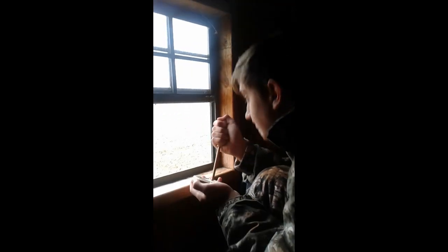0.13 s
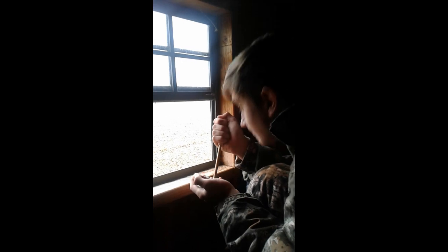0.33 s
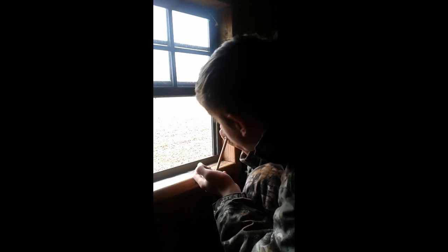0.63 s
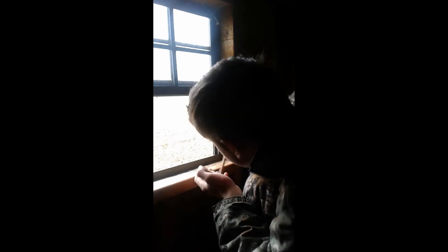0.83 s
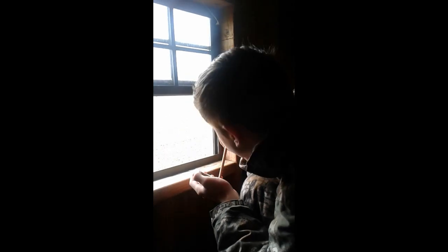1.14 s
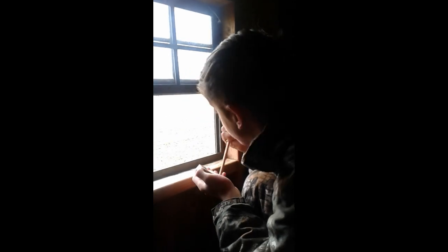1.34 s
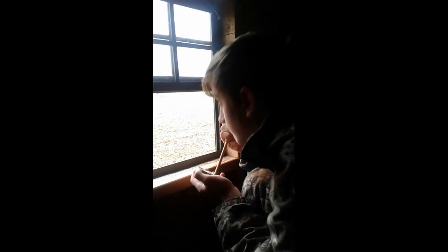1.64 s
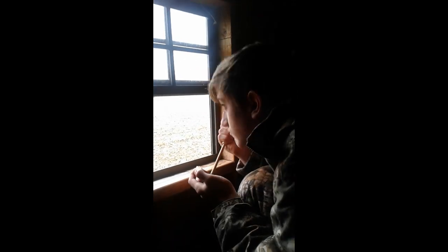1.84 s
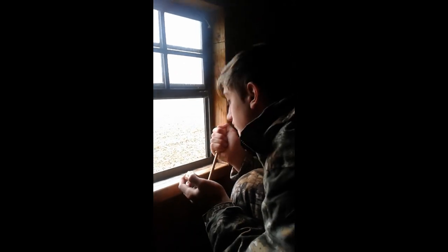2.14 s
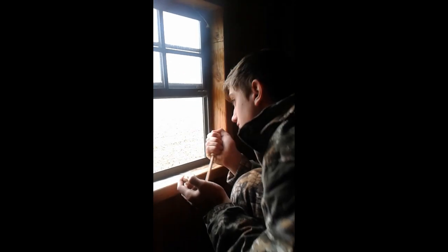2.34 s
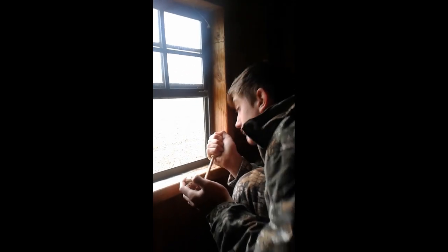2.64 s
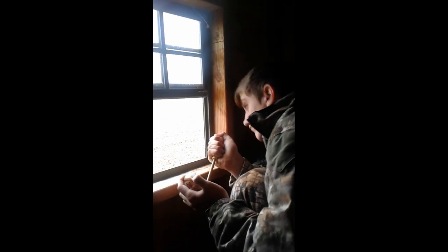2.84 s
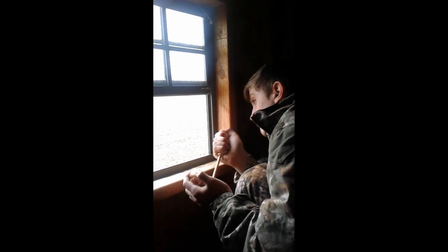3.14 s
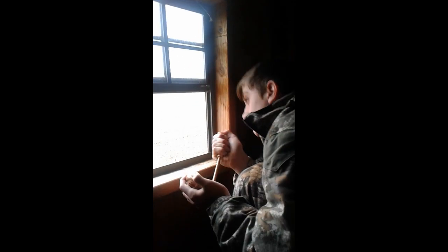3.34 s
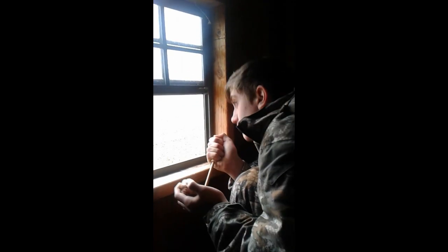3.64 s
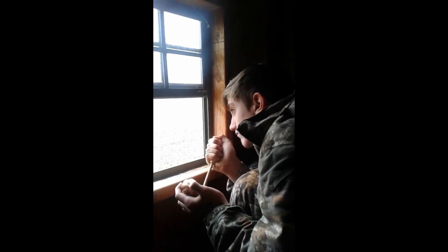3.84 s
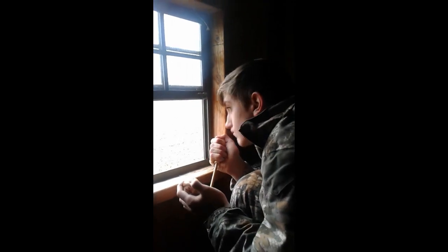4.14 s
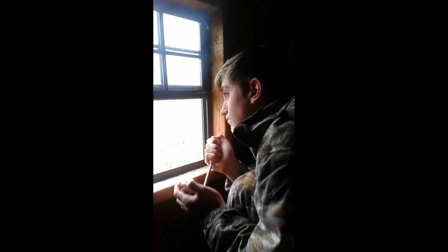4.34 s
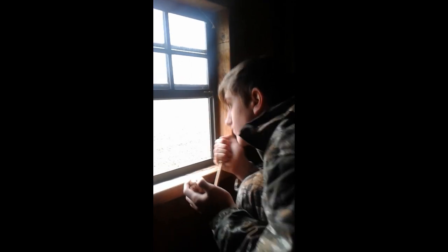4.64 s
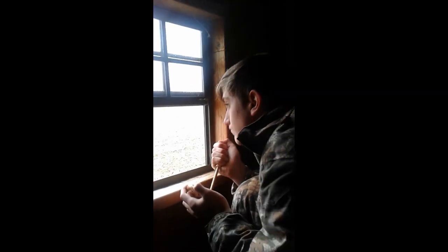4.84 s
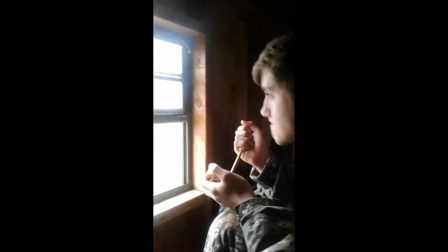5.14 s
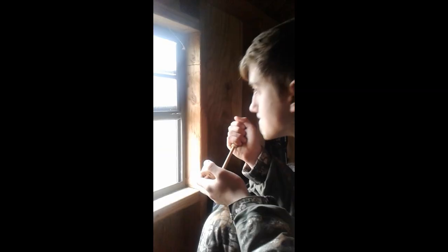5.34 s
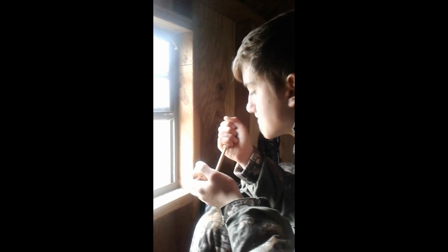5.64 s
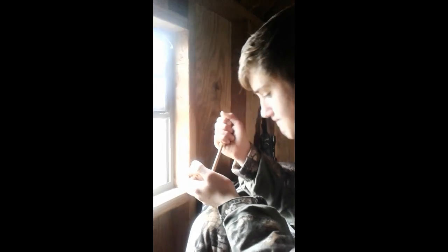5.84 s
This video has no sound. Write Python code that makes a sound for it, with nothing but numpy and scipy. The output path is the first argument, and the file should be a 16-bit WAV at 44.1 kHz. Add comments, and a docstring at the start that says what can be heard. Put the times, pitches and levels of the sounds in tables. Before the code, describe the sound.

A peg is stroked on a friction pot call, making short, raspy, turkey-like yelps at about four a second, uneven in pitch. The peg scrapes lightly in some gaps. Wood is bumped softly early on, then twice, harder, near the end, before the last yelps. The plank walls of a small hunting blind add a brief echo over a faint rumble of outdoor air. It is heard on the left side only.

```python
"""A friction pot call in a small wooden hunting blind, over a faint rumble of outdoor air.
From the start, quick strokes of the peg give raspy yelps, about four a second: the peg sticks and slips
some 300 to 650 times a second and rings the pot; the plank walls answer briefly.
In some gaps the peg slides lightly. Wood is bumped softly at 1.5 s, then twice, harder, just after 5 s.
The last yelp comes at 5.7 s."""
import sys
import numpy as np
from scipy import signal
from scipy.fft import rfft, irfft, next_fast_len
from scipy.io import wavfile
from scipy.ndimage import uniform_filter1d, minimum_filter1d, map_coordinates

SR = 44100
rng = np.random.default_rng(int(sys.argv[2]) if len(sys.argv) > 2 else 0)


def wav_record(signal):
    """Record a signal, one row per channel, as 16-bit PCM in the file named by sys.argv[1]."""
    frames = np.transpose(np.atleast_2d(signal))
    bounded = np.clip(frames, -1, 1)
    # unit amplitude maps onto the largest positive 16-bit level
    quanta = np.round(bounded * 32767).astype(np.int16)
    wavfile.write(sys.argv[1], SR, quanta)


N = 263717


def amp(db):
    return 10 ** (np.asarray(db) / 20)


def unit(x):
    return x / np.sqrt(np.mean(x ** 2) + 1e-20)


def along(points, hz):
    """Interpolate (f/Hz, value) points on a log axis."""
    f, v = np.transpose(points)
    return np.interp(np.log(hz + 1), np.log(f + 1), v)


def wobble(t, per_s):
    """Smooth random curve."""
    return map_coordinates(rng.standard_normal(128), [t * per_s], mode="mirror")


def filtered(x, response):
    """Apply a complex frequency response."""
    m = next_fast_len(len(x) + 8192)
    return irfft(rfft(x, m) * response(np.fft.rfftfreq(m, 1 / SR)), m)[:len(x)]


def shaped_noise(count, response):
    """Filtered noise at rms 1."""
    return unit(filtered(rng.standard_normal(count), response))


def steady(x, size=700):
    """Hold x near rms 1 over a few slips."""
    power = np.abs(uniform_filter1d(uniform_filter1d(x ** 2, size), size // 2))
    return x / np.sqrt(power + np.mean(x ** 2) / 100)


def pulses(times_s, sizes, count):
    """Sharp pulses placed between samples."""
    at = times_s[:, None] * SR
    taps = np.floor(at).astype(int) + np.arange(-7, 9)
    shapes = sizes[:, None] * np.sinc(taps - at) * np.cos(np.pi * (taps - at) / 16) ** 2
    return np.bincount(np.clip(taps, 0, count).ravel(), shapes.ravel(), count + 1)[:count]


def add(track, start_s, x):
    i = round(start_s * SR)
    part = x[max(-i, 0):N - i]
    track[max(i, 0):][:len(part)] += part


def air(hush_db=-69, rumble_db=-67.5, rumble_hz=80, sleeve_db=-74, sleeve_hz=4800):
    """Even outdoor hush, a low rumble that swells now and then, and the rustle of a moving sleeve."""
    # outdoor air: f/Hz, density/dB
    spectrum = [(15, -43.5), (25, -21.5), (127, -35), (370, 6), (469, 7.5), (1270, -12.5), (1520, -20.5),
                (5930, -16.5), (8780, -53.5), (12000, -38.5), (13000, -34)]
    # rumble swells: t/s, half-width/s, level/dB
    swells = [(.95, 0.063, -52.5), (4.451, 0.034, -62), (5.199, 0.14, -61.5)]
    t = np.arange(N) / SR
    hush = shaped_noise(N, lambda hz: amp(along(spectrum, hz)))
    rumble = shaped_noise(N, lambda hz: (hz / rumble_hz) ** 4 / (1 + (hz / rumble_hz) ** 5.5))
    sleeve = shaped_noise(N, lambda hz: (hz / sleeve_hz) ** 2 / (1 + (hz / sleeve_hz) ** 10))
    swell = sum(amp(db) * np.exp(-((t - at_s) / width_s) ** 2) for at_s, width_s, db in swells)
    sleeve_gain = amp(sleeve_db + 2.4 * wobble(t, per_s=5.7))
    return amp(hush_db) * hush + (amp(rumble_db) + swell) * rumble + sleeve_gain * sleeve


def in_blind(x, wet_db=-5.0, delay_s=0.0053, build_s=0.011):
    """Direct sound plus the walls' answer, which differs with each position of the hands."""
    # wall reverberation: f/Hz, t60/s
    decay = [(200, .28), (1000, .285), (3000, .285), (7000, .28), (12000, .24)]
    hz, t, noise = signal.stft(rng.standard_normal(SR // 2), SR, nperseg=256)
    tail = signal.istft(noise * amp(-60 * t / along(decay, hz)[:, None]), SR, nperseg=256)[1]
    tail *= np.clip((np.arange(len(tail)) / SR - delay_s) / build_s, 0, 1)
    answer = signal.fftconvolve(x, tail)
    answer *= amp(wet_db) * np.linalg.norm(x) / np.linalg.norm(answer)
    return answer + np.pad(x, (0, len(tail) - 1))


def bumps(soft_hz=2200, thud_hz=99, thud_t60_s=0.033, thud_rise_s=0.00085):
    """Bumped wood: a short knock over a low thud that swells more slowly."""
    # bumps on wood: t/s, knock/dB, thud/dB
    hits = [(1.462, -46, -58), (5.026, -37, -45), (5.0615, -22, -25)]
    # wood modes: f/Hz, level/dB, t60/s
    modes = [(476, -1.5, 0.024), (690, 11.5, 0.005), (990, -8, 0.0064)]
    out, t = np.zeros(N), np.arange(SR // 4) / SR
    ring = lambda hz, t60_s: np.sin(2 * np.pi * hz * t) * amp(-60 * t / t60_s)
    knock = sum(amp(db) * ring(hz, t60_s) for hz, db, t60_s in modes) / 2
    knock = filtered(knock, lambda hz: 1 / (1 + 1j * hz / soft_hz) ** 2)  # soft contact, little treble
    thud = ring(thud_hz, thud_t60_s) * (1 - np.exp(-t / thud_rise_s))
    for start_s, knock_db, thud_db in hits:
        add(out, start_s, in_blind(amp(knock_db) * knock + amp(thud_db) * thud, wet_db=-21.5))
    return out


def pot(hz):
    """What the pot radiates for a push of the peg."""
    # pot and peg resonances: f/Hz, width/Hz, level/dB
    modes = [(1000, 333, -0.5), (1257, 233, 2), (1978, 206, -10.5), (2608, 178, -8.5), (3891, 252, -7),
             (5045, 583, -15.5), (6194, 1285, -18)]
    # radiation of the pot and rounding of each slip by the soft tip: f/Hz, gain/dB
    radiation = [(100, -4.5), (300, -7.5), (650, -13), (950, -4), (6500, -11.5), (8500, -20),
                 (12200, -30.5), (13000, -40.5)]
    response = sum((-1) ** k * amp(db) * 1j * hz * width_hz / (f ** 2 - hz ** 2 + 1j * hz * width_hz)
                   for k, (f, width_hz, db) in enumerate(modes))
    return response * amp(along(radiation, hz))


def slides(low_cut_hz=2500):
    """The peg slides without pressure: a thin scrape through the pot."""
    # light slides: t/s, length/s, level/dB
    moves = [(0.394, .12, -57), (0.606, 0.25, -54), (1.376, 0.15, -57.5), (1.668, 0.098, -51.5),
             (3.497, 0.12, -51.5), (5.322, 0.095, -60.5)]
    out = np.zeros(N)
    for start_s, length_s, db in moves:
        count = int(length_s * SR)
        scrape = shaped_noise(SR // 4, lambda hz: pot(hz) * hz / (hz + low_cut_hz))[:count]
        add(out, start_s, in_blind(amp(db) * scrape * signal.windows.tukey(count)))
    return out


def stick_slip(rate_hz, rough, waver=0.06, jitter=0.075, scatter_db=5, limp=0.15, grit=0.8):
    """One pulse per slip; a rough grip wavers, scatters slips, weakens every other one and adds grit."""
    t = np.arange(len(rate_hz)) / SR
    cycles = np.cumsum(rate_hz * (1 + waver * rough * wobble(t, per_s=130.2))) / SR
    slip = np.arange(int(cycles[-1]))
    times_s = np.interp(slip, cycles, t)
    slip_rough = np.interp(times_s, t, rough)
    period_s = 1 / np.interp(times_s, t, rate_hz)
    late, strong = rng.uniform(-1.7, 1.7, (128, 2))[:len(slip)].T
    sizes = amp(scatter_db * slip_rough * strong) * (1 + limp * np.sqrt(slip_rough) * (-1) ** slip)
    train = unit(pulses(times_s + jitter * slip_rough ** 2 * period_s * late, sizes, len(t)))
    scrape = unit(rng.standard_normal(SR // 4)[:len(t)] * (1 + np.cos(np.pi * cycles) ** 2))
    return train + grit * rough * scrape


def bending_waves(x, uneven=0.093, shifts_per_s=45):
    """Each slip spreads over a few ms; the paths shift as the peg moves, so overtones flutter."""
    count = SR // 250
    m = next_fast_len(len(x) + 2048)
    paths = rfft(rng.standard_normal((2, count)) * np.linspace(1, 0, count), m)
    one, other = irfft(rfft(x, m) * paths / np.abs(paths) ** (1 - uneven), m)[:, :len(x)]
    turn = np.pi / 4 + wobble(np.arange(len(x)) / SR, shifts_per_s) / 2
    return np.cos(turn) * one + np.sin(turn) * other


def registers(force, length_s, bass_hz=290, rasp_hz=1600, edge_hz=3200, sizzle_hz=7400):
    """The pot's main ring, rasp and treble edge under one stroke, each near rms 1."""
    spot = 1 + 0.022 * rng.standard_normal()  # each stroke starts at another spot on the pot
    ring = lambda band: steady(filtered(force, lambda hz: pot(hz * spot) * band(hz)))
    below = lambda hz, corner_hz, order=16: 1 / (1 + (hz / corner_hz) ** order)
    pressed_db = 6 * np.log(length_s / 0.06)  # long strokes are pressed harder and sizzle more
    sizzle = lambda hz: amp(pressed_db * (1 - below(hz, sizzle_hz)))
    return [ring(lambda hz: below(hz, rasp_hz) * (1 - below(hz, bass_hz, order=4))),
            ring(lambda hz: below(hz, edge_hz) - below(hz, rasp_hz)),
            ring(lambda hz: (1 - below(hz, edge_hz)) * sizzle(hz))]


def yelp(start_s, length_s, bite, softness, landing_hz, bite_hz, lifting_hz, rough,
         main_db, rasp_db, edge_db, attack_s=0.0039, release_s=0.011, ease=1.72):
    """One stroke: pressure rises to the bite, then eases; slip rate, roughness and brightness follow."""
    # the peg skids and catches again: t/s, half-width/s, dip/dB
    skids = [(1.072, 0.015, 7.5), (1.809, 0.016, 4), (2.839, 0.0078, 10.5), (3.717, 0.012, 5.5)]
    # light-touch loss on landing, at softness 1: main/dB, rasp/dB, edge/dB
    landing_loss_db = [4.5, 10, 13.5]
    # light-touch loss on lifting: main/dB, rasp/dB, edge/dB
    lifting_loss_db = [0.5, -0.5, 5.5]
    t = np.arange(int((length_s + 0.04) * SR)) / SR
    landing = np.clip(1 - t / length_s / bite, 0, 1)  # 1 at first touch, 0 from the bite on
    lifting = np.clip((t / length_s - bite) / (1 - bite), 0, 1)  # 0 up to the bite, 1 as the peg leaves
    settle_hz = (landing_hz - bite_hz) * landing ** 1.5
    flick_hz = (lifting_hz - bite_hz) * lifting ** 2.4
    rough = rough * (1 - 0.32 * landing) + 0.29 * lifting ** ease  # the grip breaks up on lifting
    for at_s, width_s, dip_db in skids:
        if start_s < at_s < start_s + length_s:
            main_db = main_db - dip_db * np.exp(-((start_s + t - at_s) / width_s) ** 2)
            rough = rough + 0.25 * (start_s + t > at_s - width_s)
    force = bending_waves(stick_slip(bite_hz + settle_hz + flick_hz, np.clip(rough, 0.15, 1)))
    rings = registers(force, length_s)
    sound = 0
    for ring, db, early_db, late_db in zip(rings, [0, rasp_db, edge_db], landing_loss_db, lifting_loss_db):
        loss_db = softness * early_db * landing ** ease + late_db * lifting ** ease
        chatter_db = 3.52 * wobble(t, per_s=110)  # uneven grip
        sound = sound + ring * amp(main_db + db - loss_db + chatter_db)
    contact = np.clip(t / attack_s, 0, 1) * np.exp(-np.maximum(t - length_s, 0) / release_s)
    return contact * sound


def calling():
    """Strokes of the peg on the pot, each a yelp that the walls answer."""
    # strokes: t/s, length/s, bite position/length, landing softness, slip rate on landing/Hz,
    # at the bite/Hz, on lifting/Hz, roughness 0-1, main ring/dB, rasp/dB re main, edge/dB re main
    strokes = [ (0.000, 0.073, 0.34, 0.76, 564.3, 484.9, 579.8, 0.57, -18, -5, -5),
               (0.243, 0.058, 0.44, 1.1, 304.2, 312.8, 350.3, 0.73, -20.5, -7, -13),
               (0.505, 0.037, 0.53, 1.1, 518.4, 489.5, 563, 0.17, -20.5, -5.5, -8.5),
               (0.743, 0.086, 0.51, 3.5, 427.4, 316.7, 335.6, 0.39, -18.5, -9.5, -8.5),
               (1.015, 0.087, 0.57, 0.9, 615.8, 326.6, 327.4, 0.56, -20, -8.5, -9.5),
               (1.541, 0.048, 0.85, 2.1, 317, 321.2, 326, 0.77, -23.5, -8, -16),
               (1.772, 0.073, 0.85, 1.2, 516, 445.3, 397, 0.66, -21.5, -2, -1.5),
               (1.989, 0.094, .70, 1.15, 373.3, 353.8, 549.3, .45, -19.5, -4.5, -6),
               (2.271, 0.052, 0.54, 0.69, 340, 305.2, 333, 0.63, -20, -0.5, -3.5),
               (2.567, .045, .7, 1.22, 468.5, 447, 556, 0.54, -21, 0, -5),
               (2.779, 0.088, 0.45, 0.66, 566, 484, 547.5, .22, -15, -10, -7),
               (3.128, 0.028, 0.57, 0.94, 487, 543, 613, 0.16, -21.5, 2, -7),
               (3.377, 0.037, 0.62, 1.54, 302, 320, 354, 0.61, -22, -7, -8.5),
               (3.650, 0.083, 0.7, 2.1, 679.6, 501, 563, 0.28, -15.5, -6, -11.5),
               (3.936, 0.056, .33, 1.1, 497, 512.9, 586.5, 0.1, -19.5, 0, -6),
               (4.2, 0.052, .68, 1, 377.6, 381.9, 616.7, .33, -16.5, -7.5, -9),
               (4.467, .031, 0.79, 1.5, 342.7, 303.2, 313.5, 0.78, -20, -6.5, -11.5),
               (4.658, 0.039, 0.43, 0.92, 369, 505, 593.6, 0.39, -18.5, -1.5, -5.5),
               (4.939, 0.021, 0.62, 0.32, 499, 527.6, 541.4, 0.18, -23, -4, -12),
               (5.105, 0.038, 0.38, 0.27, 546, 543, 562, 0.6, -43.5, -8, -14.5),
               (5.438, 0.046, 0.67, 1.24, 348.2, 348.8, 445.5, 0.4, -20.5, -8, -15.5),
               (5.694, 0.035, 0.52, 1.1, 618.4, 630, 634, 0.1, -18.5, -9.5, -15)]
    out = np.zeros(N)
    for start_s, *stroke in strokes:
        add(out, start_s, in_blind(yelp(start_s, *stroke)))
    return out


def scene():
    """One microphone on the left channel; the right is all but silent."""
    sound = calling() + slides() + bumps() + air()
    return np.array([sound, sound * amp(-81.5)]) * amp(4)


def record(dry, low_cut_hz=65, ceiling=0.86, top_hz=13300):
    """Recorder: low cut, peak limiter, band limit."""
    thin = signal.sosfilt(signal.butter(2, low_cut_hz, "high", fs=SR, output="sos"), dry)
    needed_gain = 1 / np.maximum(np.abs(thin).max(axis=0) / ceiling, 1)
    gain = uniform_filter1d(minimum_filter1d(needed_gain, size=441), size=441)
    return np.array([filtered(channel, lambda hz: hz < top_hz) for channel in thin * gain])


dry = scene()
out = record(dry)
wav_record(out)
```